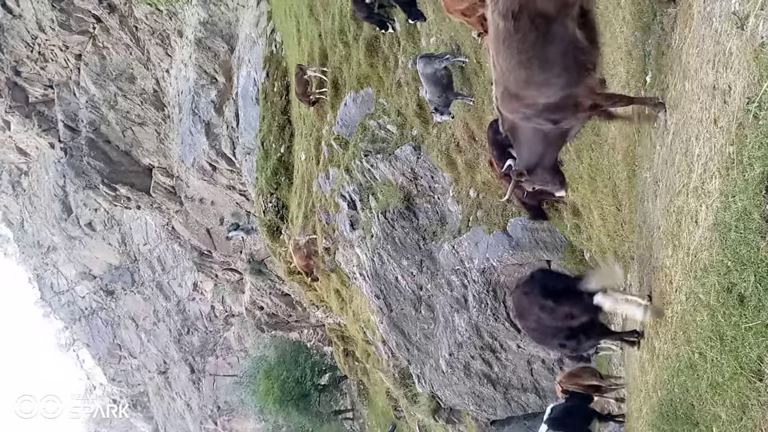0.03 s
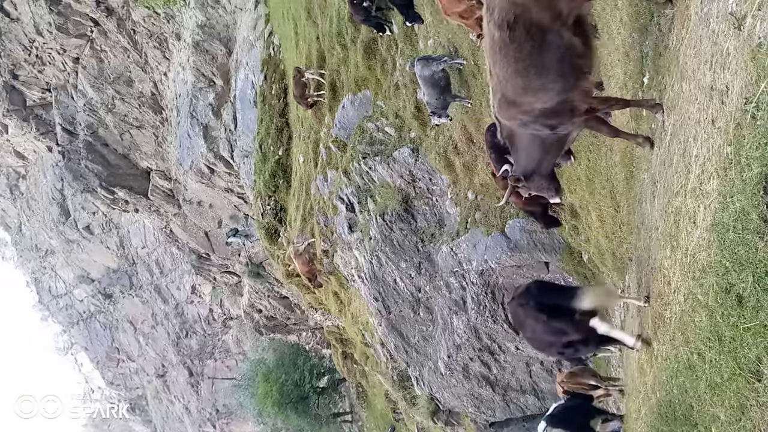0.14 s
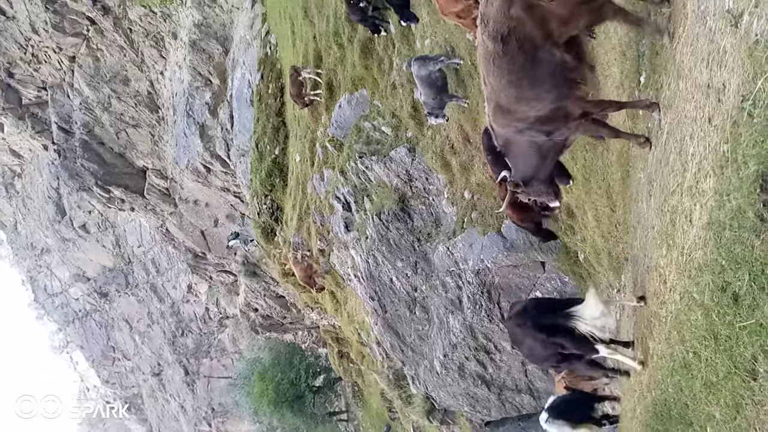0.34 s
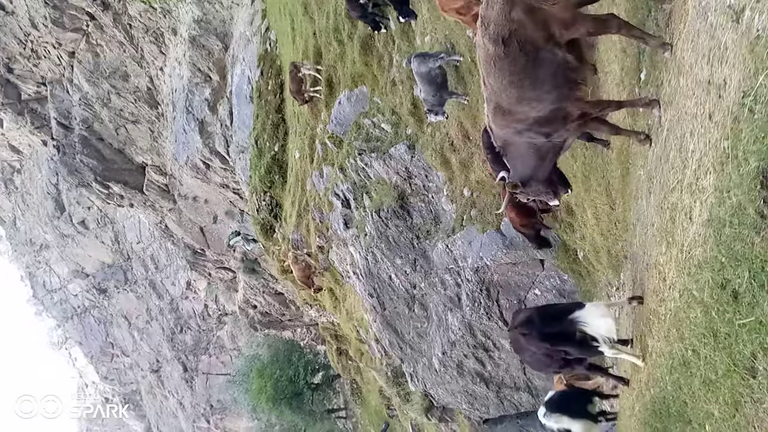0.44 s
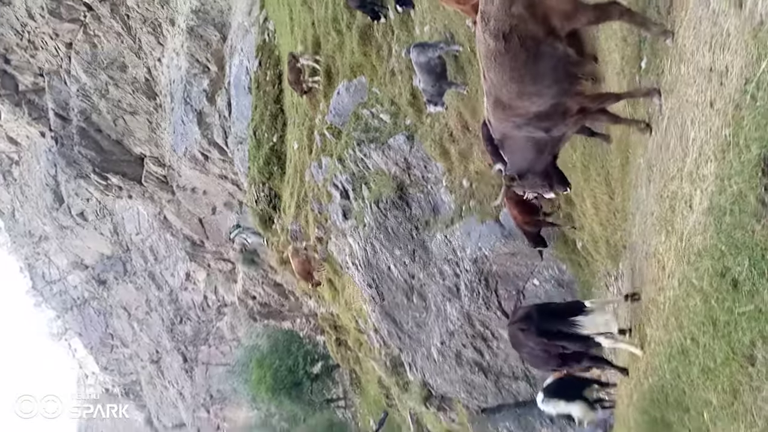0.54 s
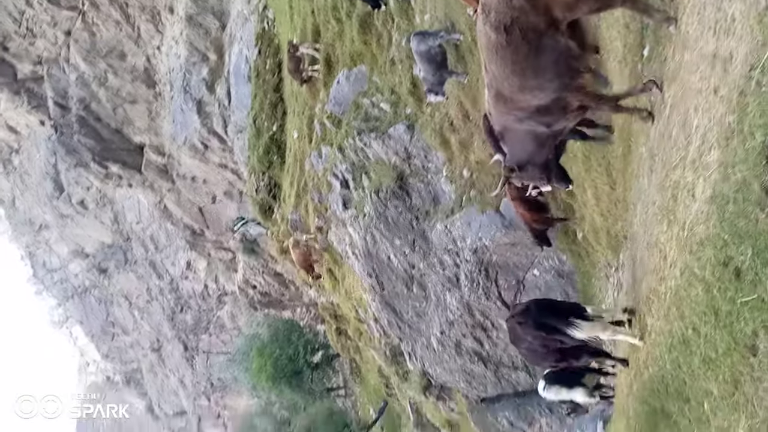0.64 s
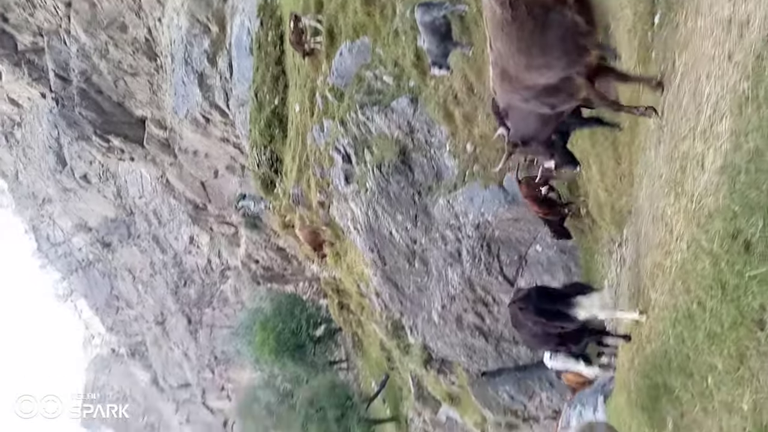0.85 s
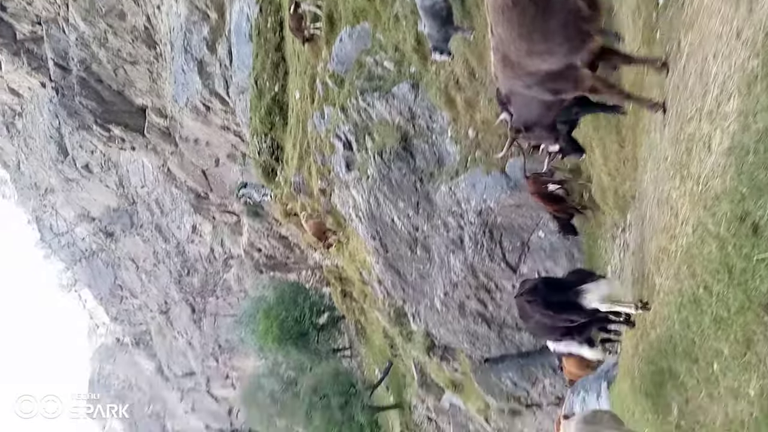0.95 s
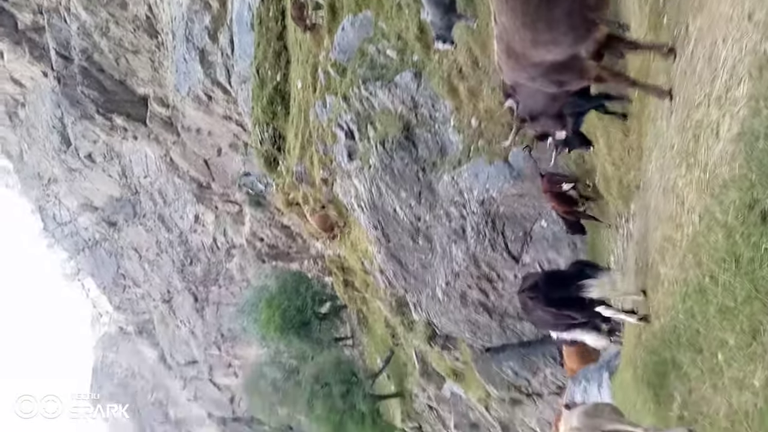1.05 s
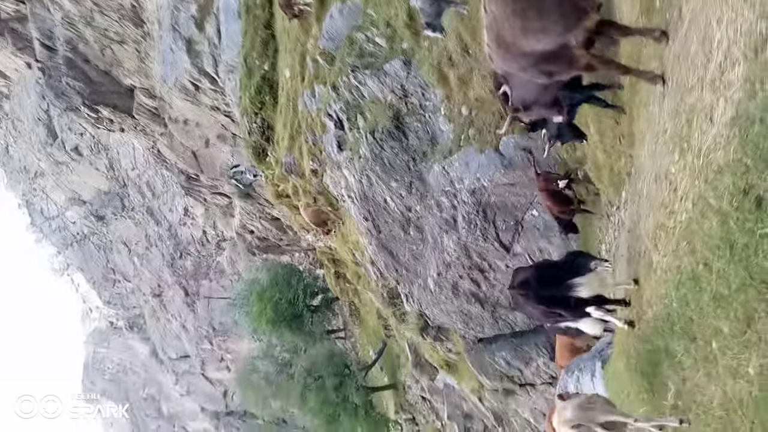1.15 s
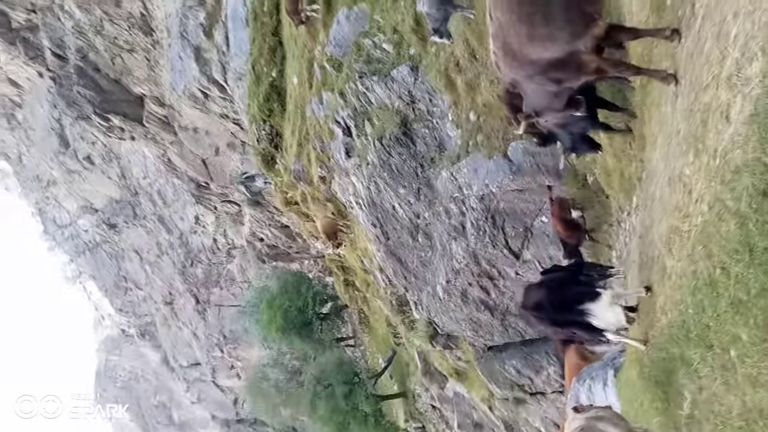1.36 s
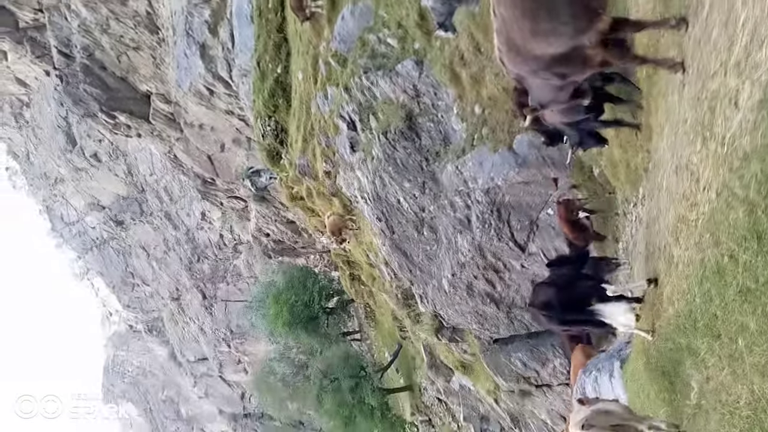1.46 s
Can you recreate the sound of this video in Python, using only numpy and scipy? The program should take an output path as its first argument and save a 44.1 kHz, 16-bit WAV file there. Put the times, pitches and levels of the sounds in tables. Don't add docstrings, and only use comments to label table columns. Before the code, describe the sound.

A cow's single moo cracks from clear bellow to rough grunt over steady wind and hiss

```python
import sys
import numpy as np
from scipy import signal
from scipy.io import wavfile
from scipy.ndimage import uniform_filter1d

SR = 44100
rng = np.random.default_rng(int(sys.argv[2]) if len(sys.argv) > 2 else 0)


def makeup_ratio(level_db):
    decades = np.asarray(level_db, float) / 20
    return 10 ** decades


def materialize(psi):
    bounded = np.clip(np.atleast_2d(psi).T, -1, 1)
    quanta = np.round(bounded * 32767).astype(np.int16)
    wavfile.write(sys.argv[1], SR, quanta)


N = 66150


def evened(x):
    return x / np.sqrt(np.mean(x ** 2) + 1e-20)


def drift(n, hz):
    smooth = signal.butter(2, hz, fs=SR, output="sos")
    return evened(signal.sosfiltfilt(smooth, rng.standard_normal(n)))


def add(mix, start_s, sound):
    at = round(start_s * SR)
    part = mix[max(at, 0):][:len(sound) + min(at, 0)]
    part += sound[max(-at, 0):][:len(part)]


def resonate(x, hz, width_hz):
    turn = np.exp(2j * np.pi * hz * np.arange(len(x)) / SR)
    r = np.exp(-np.pi * width_hz / SR)
    lowered = x / turn
    return 2 * (turn * signal.lfilter([(1 - r) ** 2], np.convolve([1, -r], [1, -r]), lowered)).real


def controls(table, edge_s):
    rows = np.array(table, float).T
    t = np.arange(rows[0, 0], rows[0, -1], 1 / SR)
    edge = np.clip(np.minimum(t - t[0], t[-1] - t) / edge_s, 0, 1)
    curves = [uniform_filter1d(np.interp(t, rows[0], c), size=300) for c in rows[1:]]
    return t, edge, curves


# time_s, pitch_hz, effort_db, throat_ring_db, bright_mouth_db, slow_vibration_db
BELLOW = [
    (.295, 479, -41, -52, -51.5, -57),
    (.32, 488, -36, -39.5, -42, -60),
    (.352, 499.8, -36.5, -27, -41.5, -64.5),
    (.39, 508.2, -33, -27, -49, -51.5),
    (.59, 504.9, -32.5, -24, -36.5, -50),
    (.697, 492.3, -34.5, -22, -35, -41.5),
    (.735, 483, -33.5, -27, -38.5, -43.5),
    (.797, 475.5, -36.5, -27.5, -39.5, -44),
    (.832, 462, -41, -40, -53.5, -46),
]
# multiple_of_pitch, level_db, bright_mouth_share, fade_db_per_s
UPPER_PARTIALS = [(4, -11, 0.05, -38), (5, -27.5, .6, -4.5)]
# pitch_hz, width_hz, level_db
RASP_HOLLOWS = [(666.4, 29, -4), (1124, 56, -6.5), (1604, 92, -2), (2064, 130, -5.5)]
# multiple_of_pitch, slow_steps, level_db
SIDE_TONES = [(0, 1, -21.5), (1, 1, -3.5), (2, 1, -8.5), (2, -1, -15.5), (3, -1, -5), (3, 1, -3),
              (4, -1, -10), (4, 1, -9)]


def bellow():
    t, edge, (hz, effort_db, ring_db, bright_db, slow_db) = controls(BELLOW, 0.0076)
    slow_on_s, slow_rise_s = .74, .06
    grown = np.clip(1 - (slow_on_s - t) / slow_rise_s, .15, 1)
    waver = 0.0034 * grown * drift(len(t), 40)
    turn = 2 * np.pi * np.cumsum(hz * (1 + waver)) / SR
    slow_wander = .2 * drift(len(t), 45)
    slow = turn / 3 + 2 * np.pi * np.cumsum(hz / 3 * slow_wander) / SR
    ring_db = ring_db + 2.1 * grown * drift(len(t), 75)

    out = makeup_ratio(effort_db) * np.cos(turn)
    out += makeup_ratio(ring_db) * np.cos(2 * turn)
    out += makeup_ratio(bright_db) * np.cos(3 * turn)
    for k, db, share, fade_db in UPPER_PARTIALS:
        source_db = (1 - share) * ring_db + share * (bright_db + 11.5)
        out += makeup_ratio(db + source_db + fade_db * (t - t[0])) * np.cos(round(k) * turn)

    breath = rng.standard_normal(len(t))
    rasp = sum(makeup_ratio(db) * evened(resonate(breath, f, w)) for f, w, db in RASP_HOLLOWS)
    out += makeup_ratio(slow_db) * grown * rasp
    for k, step, db in SIDE_TONES:
        level = makeup_ratio(slow_db + db + 2.5 * drift(len(t), 36))
        out += level * np.cos(round(k) * turn + round(step) * slow + rng.uniform(0, 6))
    return t[0], np.sqrt(2) * edge * out


# time_s, pitch_hz, effort_db, throat_ring_db
HIGH_NOTE = [
    (.15, 388.6, -41, -51),
    (.172, 394, -44, -55),
    (.21, 440, -38.5, -50.5),
    (.25, 438, -37.5, -48),
    (.268, 459, -42, -62.5),
    (.288, 462, -47, -62),
]


def high_note():
    t, edge, (hz, effort_db, ring_db) = controls(HIGH_NOTE, 0.0054)
    turn = 2 * np.pi * np.cumsum(hz * (1 + .006 * drift(len(t), 50))) / SR
    out = makeup_ratio(effort_db) * np.cos(turn)
    out += makeup_ratio(ring_db) * (np.cos(2 * turn) + makeup_ratio(-7) * np.cos(4 * turn))
    return t[0], np.sqrt(2) * edge * out


def pulsed(call, throat, jitter, noise, weak, rise, fade_db):
    start_s, length_s, from_hz, to_hz, level_db = call
    t = np.arange(0, length_s, 1 / SR)
    u = t / length_s
    glide_hz = from_hz + (to_hz - from_hz) * u
    turns = np.cumsum(glide_hz * (1 + jitter * drift(len(t), 70))) / SR
    folds = sum(np.cos(2 * np.pi * k * turns) for k in range(1, 9))
    folds = folds * (1 + weak * np.cos(np.pi * turns))
    puffs = (0.36 + np.exp(-(turns % 1) / .3)) * rng.standard_normal(len(t))
    drive = (1 - noise) * evened(folds) + noise * 3 * evened(puffs)
    out = sum((-1) ** k * makeup_ratio(db) * resonate(drive, f, w) for k, (f, w, db) in enumerate(throat))
    edge = np.minimum(u / rise, 1) * np.minimum((1 - u) / 0.23, 1)
    return start_s, edge * makeup_ratio(level_db + fade_db * u ** 2) * evened(out)


# start_s, length_s, from_hz, to_hz, level_db
GRUNT = (.824, .09, 348, 312, -29)
# pitch_hz, width_hz, level_db
GRUNT_THROAT = [(331, 240, -8), (540, 116, -4), (662, 128, -4), (993, 140, 1.5), (1364, 110, -10.5),
                (1603, 145, -4.5), (2037, 270, -11.5)]


def grunt():
    return pulsed(GRUNT, GRUNT_THROAT, jitter=.1, noise=.2, weak=.85, rise=.1, fade_db=-15)


# start_s, length_s, from_hz, to_hz, level_db
HUM = (.035, .13, 115, 170, -45)
# pitch_hz, width_hz, level_db
HUM_THROAT = [(145, 90, 1), (490, 110, 0), (600, 100, -4)]


def hum():
    return pulsed(HUM, HUM_THROAT, jitter=.03, noise=.25, weak=.05, rise=.3, fade_db=-1.5)


# start_s, length_s, from_hz, to_hz, level_db
FAINT_TONES = [
    (-.04, .16, 1358, 1255, -46.5),
    (.87, .1, 335, 325, -51),
    (1.06, .135, 616, 600, -50),
    (1.075, .1, 920, 918, -52.5),
]


def faint_tone(start_s, length_s, from_hz, to_hz, level_db):
    u = np.arange(0, length_s, 1 / SR) / length_s
    hz = (from_hz + (to_hz - from_hz) * u) * (1 + 0.0052 * drift(len(u), 30))
    swell = np.sin(np.pi * u) ** 0.34
    return start_s, np.sqrt(2) * makeup_ratio(level_db) * swell * np.sin(2 * np.pi * np.cumsum(hz) / SR)


def slope_echoes(x):
    fade_60db_s = 0.067
    at = np.arange(300, SR // 2, 30)
    taps = np.zeros(SR // 2 + 30)
    signs = rng.choice([-1., 1.], len(at))
    taps[at + rng.integers(0, 30, len(at))] = signs * makeup_ratio(-60 * at / SR / fade_60db_s)
    return signal.fftconvolve(x, taps / np.linalg.norm(taps))[:N]


def read(points, hz):
    f, value = np.transpose(points)
    return np.interp(np.log(hz + 1), np.log(f + 1), value, left=-90, right=-90)


def air(points, level_db, sag_db_per_s, patchy_db, flicker_db):
    frames, hz = N // 256 + 5, np.fft.rfftfreq(1024, 1 / SR)
    a, b, patches = rng.standard_normal((frames, 513, 3)).T
    patches = uniform_filter1d(patches, size=12, axis=0)
    patches = evened(uniform_filter1d(patches, size=12, axis=1))
    flicker = evened(uniform_filter1d(rng.standard_normal(frames), size=4))
    colour_db = read(points, hz)[:, None] + patchy_db * patches + flicker_db * flicker
    z = (a + 1j * b) * makeup_ratio(colour_db)
    noise = evened(signal.istft(z, nperseg=1024, noverlap=768)[1][:N])
    return makeup_ratio(level_db + sag_db_per_s * (1.34 - np.arange(N) / SR)) * noise


# pitch_hz, level_db (per Hz)
WIND = [(45, -18), (70, -6.5), (300, -6.5), (800, -6), (1800, -4.5), (2350, -8), (3100, -18), (4000, -35)]


def wind():
    return air(WIND, level_db=-44.5, sag_db_per_s=1.5, patchy_db=0.9, flicker_db=0.57)


# pitch_hz, level_db (per Hz)
STREAM = [(2200, -16.5), (3100, -6.5), (4000, -1), (5100, 0), (6500, -6), (7100, -13), (8200, -21.5),
          (10000, -31.5)]
# pitch_hz, level_db (per Hz)
SHEEN = [(9500, -9.5), (11200, 1), (12300, -4.5), (13800, -9.5), (14900, 1.5), (15700, -2.5),
         (15760, -38.5)]


def stream():
    hiss = air(STREAM, level_db=-50.5, sag_db_per_s=1.5, patchy_db=0.88, flicker_db=0.32)
    sheen = air(SHEEN, level_db=-75.5, sag_db_per_s=-1.1, patchy_db=2.2, flicker_db=1.5)
    return hiss + sheen


def scene():
    herd = np.zeros(N)
    for call in (bellow, high_note, grunt, hum):
        add(herd, *call())
    for row in FAINT_TONES:
        add(herd, *faint_tone(*row))
    background = wind() + stream()
    echoes = makeup_ratio(-23) * slope_echoes(herd)
    return (herd + echoes + background)[None]


def roll_off(x):
    return signal.sosfilt(signal.butter(12, 16950, fs=SR, output="sos"), x)


def record(dry):
    thin = signal.sosfilt(signal.butter(3, 49, "high", fs=SR, output="sos"), dry)
    return roll_off(thin)


dry = scene()
out = record(dry)
materialize(out)
```